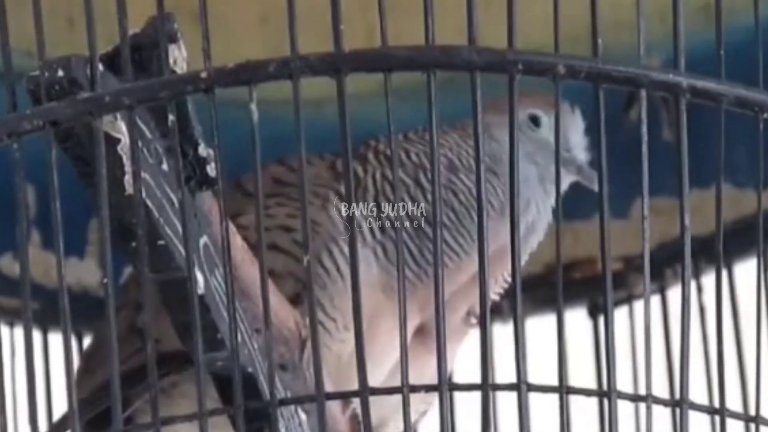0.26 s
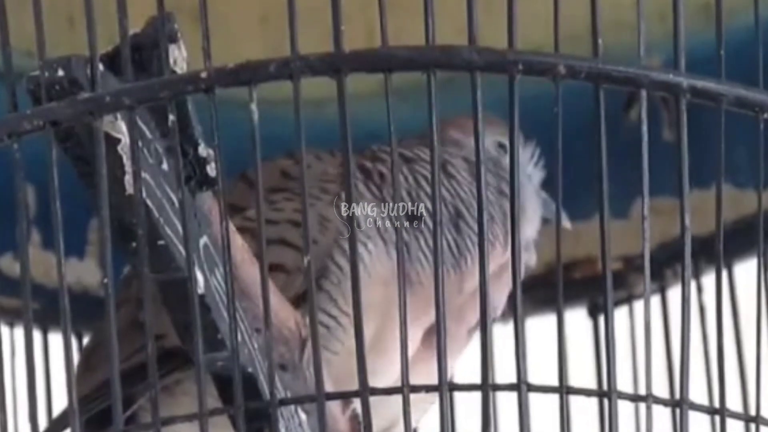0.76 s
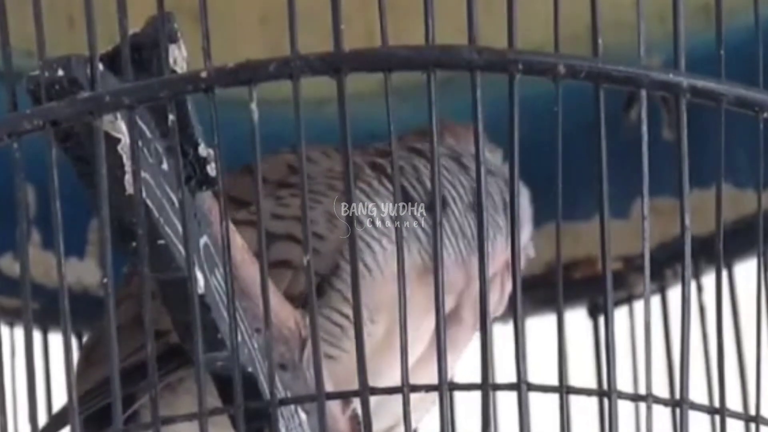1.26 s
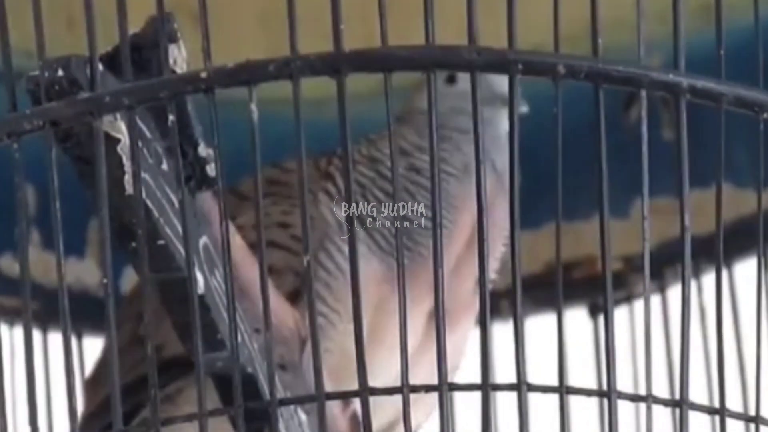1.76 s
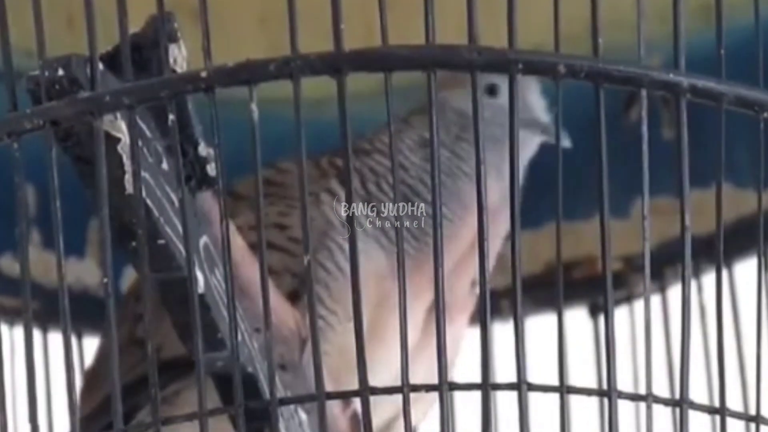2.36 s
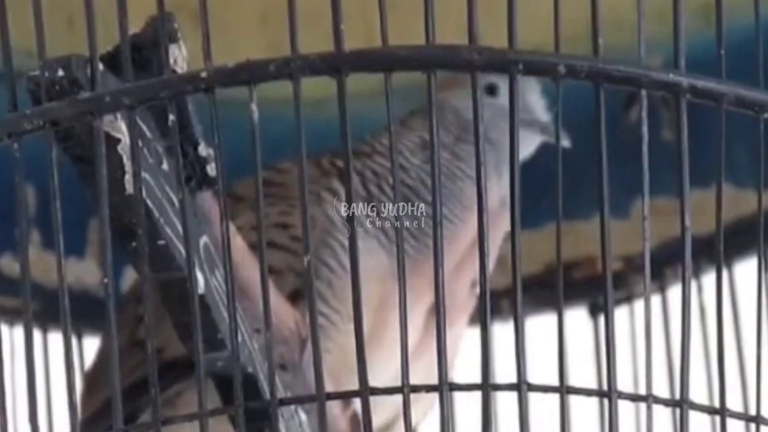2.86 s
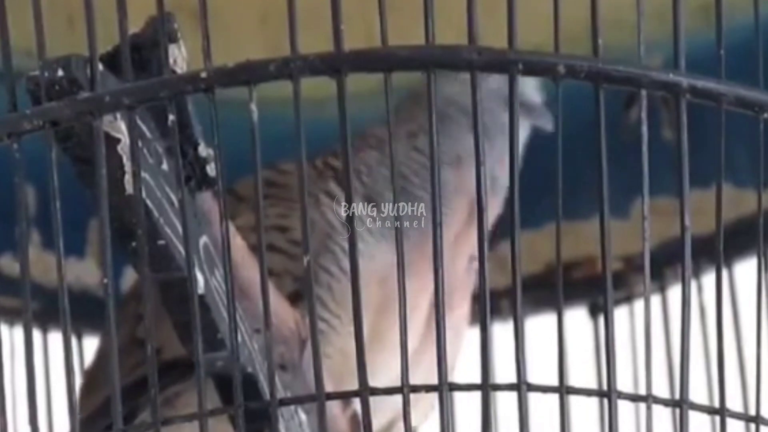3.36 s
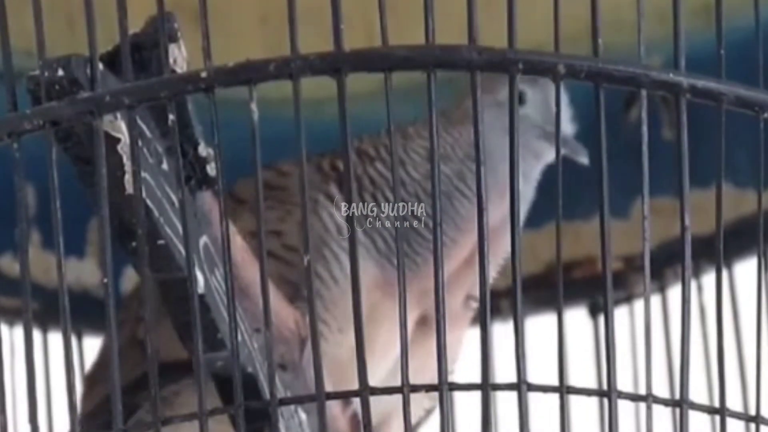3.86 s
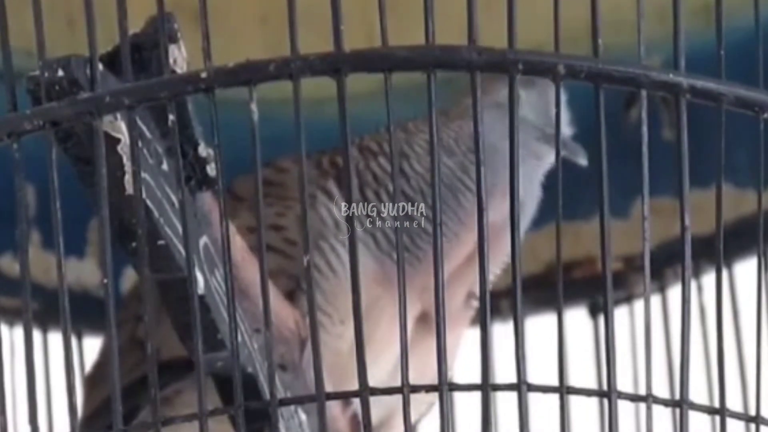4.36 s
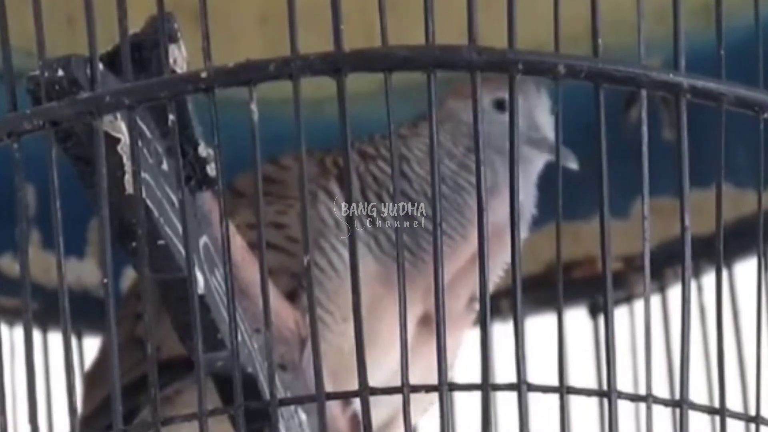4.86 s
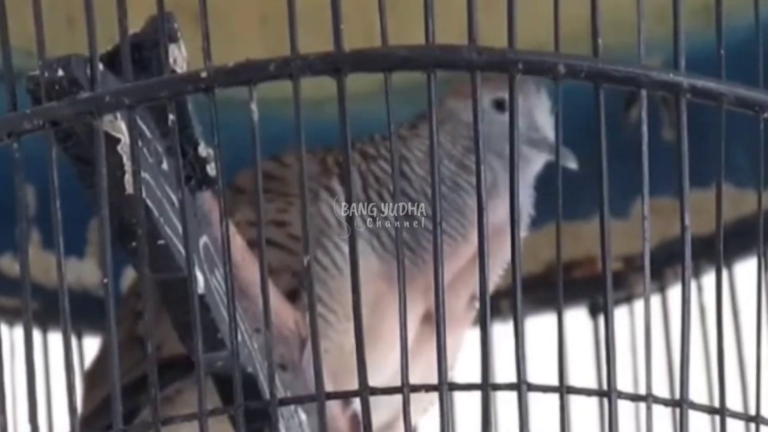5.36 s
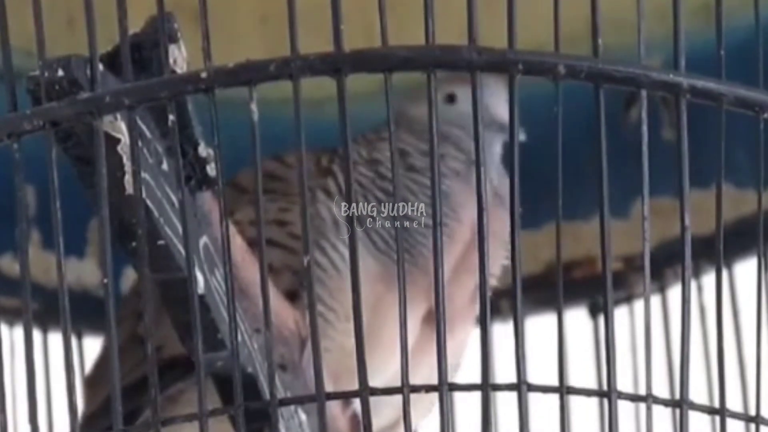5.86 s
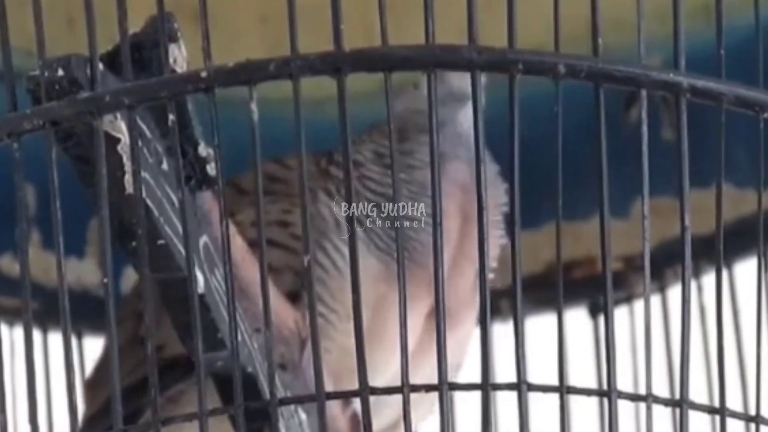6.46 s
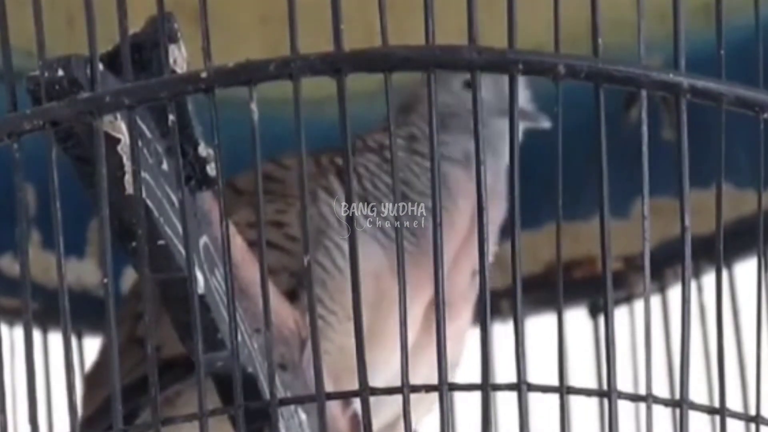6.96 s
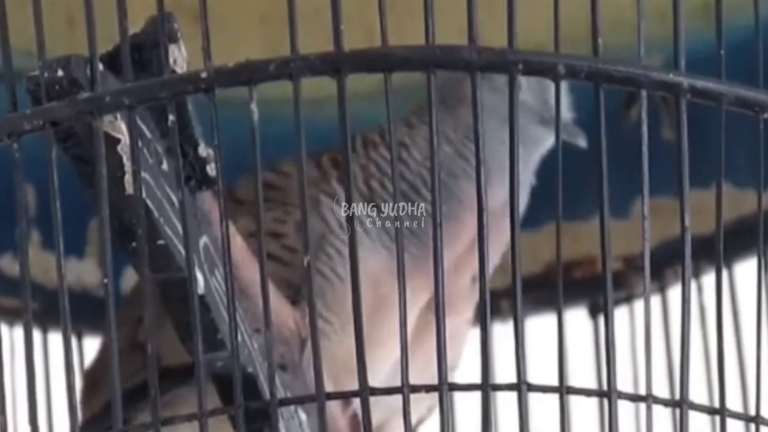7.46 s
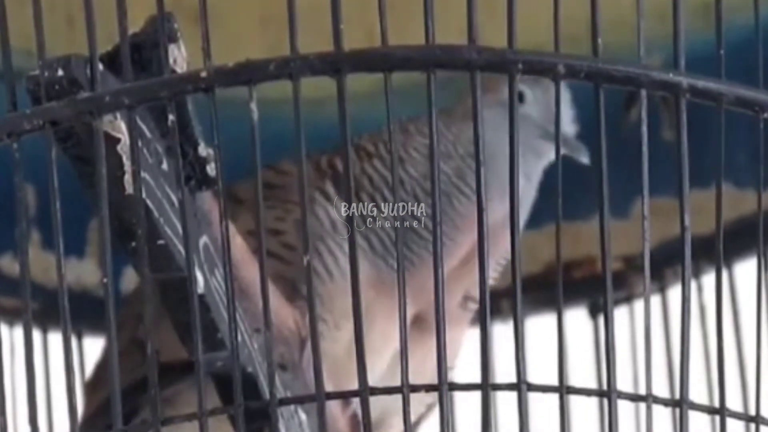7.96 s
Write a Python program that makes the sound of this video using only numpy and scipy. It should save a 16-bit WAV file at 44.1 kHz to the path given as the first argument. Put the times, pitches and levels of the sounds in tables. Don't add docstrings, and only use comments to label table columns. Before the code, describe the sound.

Caged doves in an echoing hard-walled yard, stereo microphone close and overloaded. At 0 s a low dove, slightly left, ends a trill, then gives slow hollow coos at 0.15, 0.6, 1.05 and 1.3 s. A higher dove, nearer centre, enters at 0.75 s with a firm note, quick run and falling close. After a brief lull with faint pigeon coos and a soft wing brush near 2 s, it sings again at 2.3 s, with long sagging notes until 3.7 s. The low dove trills rapidly from 3.65 to 4.15 s; the high one returns at 4.35 s until 5.1 s. From 5.5 to 6.15 s a breathy third dove gives short scooped calls amid wing brushes, tiny high peeps and throat murmurs. The high phrase returns at 6.7 s, then low trills from 7.55 s to the end, with hoarse murmurs. Gritty rasp follows the loud calls; soft ticks pepper everything.

```python
import sys
import numpy as np
from scipy import signal
from scipy.fft import rfft, irfft
from scipy.io import wavfile
from scipy.ndimage import uniform_filter1d

SR = 44100
rng = np.random.default_rng(int(sys.argv[2]) if len(sys.argv) > 2 else 0)


def nominal_scale(level):
    x = np.asarray(level, float) / 20
    return 10 ** x


def generate_wav(signal):
    frames = np.transpose(np.atleast_2d(signal))
    scaled = np.clip(frames, -1, 1) * 32767
    pcm = np.round(scaled).astype(np.int16)
    wavfile.write(sys.argv[1], SR, pcm)


N = 362061

# pitch_hz, level_db
AIR_SPECTRUM = [(18, -70.5), (30, -29), (171, -5.5), (253, -2.5), (288, -5.5), (328, -3), (355, -8.5),
                (511, -7.5), (3780, -20), (4420, -23), (6040, -27.5), (11900, -38), (15000, -57)]
# start_s, length_s, top_hz, level_db
LOW_CARRY_OVER = [
    (0, .06, 965, -27.5),
]
# start_s, length_s, level_db, falsetto_length_s (0 for none)
LOW_TRILL_SYLLABLES = [(.058, .04, -22, 0.0714), (3.65, .05, -22, 0.0464), (3.718, 0.026, -22, 0.03),
                       (3.759, .04, -22, 0.036), (3.819, 0.0583, -24, 0), (3.892, 0.0525, -24.5, 0),
                       (3.962, 0.046, -24, 0.03), (4.073, 0.04, -22.5, 0.0616),
                       (7.573, 0.061, -22.5, 0.0645), (7.625, 0.024, -21.5, 0.031),
                       (7.672, 0.048, -24.5, 0.029), (7.732, 0.0633, -25.5, 0.019),
                       (7.803, 0.0579, -25, 0.017), (7.888, .05, -23.5, 0.02), (7.983, 0.032, -21, 0.062)]
# start_s, length_s, top_hz, level_db
LOW_SLOW_COOS = [
    (0.143, 0.26, 951, -29.5),
    (.604, 0.26, 956, -29.5),
    (1.062, 0.12, 955, -28),
    (1.302, 0.27, 952.5, -30),
]
# start_s, length_s, top_hz, level_db
HIGH_OPENINGS = [
    (.758, .15, 1199, -20),
    (2.312, 0.11, 1242, -22),
    (4.352, .14, 1194, -24),
    (6.679, .16, 1207, -24),
]
# start_s, length_s, top_hz, level_db
HIGH_RUNS = [
    (.895, 0.074, 1190, -27),
    (.955, 0.072, 1145, -24.5),
    (1.04, 0.082, 1154, -25),
    (2.417, .076, 1217, -23),
    (2.482, 0.0912, 1175, -24.5),
    (2.578, 0.063, 1183, -24),
    (4.484, 0.0655, 1190, -23),
    (4.555, 0.1, 1162, -27.5),
    (6.831, 0.085, 1159, -25.5),
    (6.915, 0.095, 1174, -25),
]
# start_s, length_s, top_hz, level_db
HIGH_CLOSINGS = [
    (1.156, .15, 1164, -25.5),
    (2.668, 0.15, 1207, -25),
    (2.883, 0.17, 1171, -27.5),
    (3.146, 0.2, 1189, -27),
    (3.45, 0.24, 1184, -28),
    (4.669, 0.17, 1177, -28),
    (4.91, .18, 1163, -28),
    (7.014, .17, 1165, -26.5),
    (7.253, 0.13, 1153, -25),
]
# start_s, length_s, top_hz, level_db
FAR_SMALL_BIRDS = [
    (1.752, 0.047, 2200, -50.5),
    (1.63, 0.25, 2000, -65),
    (0.89, .06, 5250, -47),
    (6.9, .05, 7170, -55),
    (5.755, .05, 7130, -59),
    (5.868, .04, 7170, -45.5),
    (6.035, 0.072, 7200, -49.5),
    (3.3, 0.091, 3700, -52),
]
# start_s, length_s, top_hz, level_db
THROAT_MURMURS = [(2.885, 0.08, 820, -33), (4.14, 0.04, 940, -36), (8.05, 0.045, 880, -30),
                  (2.6, 0.027, 1120, -33), (1.8, .2, 1100, -51), (5.6, 0.137, 893, -40.5),
                  (5.8, 0.15, 820, -38), (6.13, 0.07, 1040, -35.5), (6.612, 0.088, 1050, -41.5),
                  (7.49, 0.23, 1126, -31.5), (3.2, 0.046, 850, -39), (2.42, .15, 766, -31.5),
                  (7.93, 0.1, 1150, -24.5), (8.12, 0.17, 1072, -26)]
# start_s, length_s, pitch_hz, level_db
PIGEON_TONES = [(1.875, 0.29, 629.6, -46.5), (1.88, 0.1, 540.5, -43.5), (1.95, 0.18, 476, -49),
                (2.09, 0.19, 561.6, -44), (2.16, .13, 695, -42.5), (2.53, 0.28, 651, -43.5),
                (2.54, 0.18, 560, -43.5), (2.75, 0.093, 546, -39), (4.79, 0.11, 614, -39.5),
                (4.83, 0.055, 517, -43), (4.96, 0.14, 576.4, -42), (5.07, 0.18, 696, -45),
                (5.08, 0.11, 627, -43), (5.27, 0.2, 566, -47), (5.3, 0.28, 706.4, -42),
                (5.5, 0.24, 622.5, -43.5), (5.55, 0.24, 549, -42.5), (7.56, 0.21, 757, -45),
                (7.58, .12, 590, -43.5), (7.85, .15, 663, -40.5), (8.09, 0.12, 565, -42)]
# peak_s, peak_db
WING_STROKES = [
    (1.93, -65.5),
    (1.993, -52.5),
    (5.516, -62),
    (5.55, -53.5),
    (5.82, -53.5),
    (5.882, -60),
]
# pitch_hz, level_db
WING_SPECTRUM = [(590, -88), (1000, -38), (1180, 2), (1300, -8), (1860, -6), (3220, 4), (3520, -4),
                 (4110, -0.5), (4540, -12), (7460, -15), (14000, -40)]
# start_s, length_s, top_hz, level_db
THIRD_NOTES = [
    (5.509, 0.071, 915, -24),
    (5.525, .05, 1156, -21.5),
    (5.555, .08, 1273, -24),
    (5.688, 0.12, 1169, -28),
    (5.744, 0.031, 954, -26.5),
    (5.843, 0.09, 1160, -27),
    (6.006, 0.064, 795, -34),
    (6.022, 0.13, 1169, -25),
]
# multiple, level_db
CLOSE_OVERTONES = [(1, 11.5), (2, -30), (4, -37), (6, -39)]
THIRD_OVERTONES = [(1, 3), (2, -23.5), (4, -23)]
PURE_TONE = [(1, 0)]
BIRD_PLACES = {"high": (-0.5, 5.5, -1.5, 0.5), "low": (3.4, 1.8, -2.44, 2), "third": (4, 5, -4.5, 0.64),
               "pigeon": (0.88, 0.2, 1.45, 3)}
# pitch_hz, level_db
RASP_SPECTRUM = [(40, -5.5), (300, -16.5), (700, -5), (1500, -2), (3000, -6.5), (6000, -11), (10000, -17),
                 (14800, -26.5), (15300, -60)]

CLOSE_WAVER = .002


def drift(rate_hz):
    r = np.exp(-2 * np.pi * rate_hz / SR)
    slow = signal.lfilter([1], [1, -2 * r, r * r], rng.standard_normal(N + SR))[SR:]
    return slow / slow.std()


def stereo(mid, side, alike):
    return np.sqrt(1 + alike) * mid + np.sqrt(1 - alike) * side * [[1], [-1]]


def coloured(spectrum, alike):
    hz, level_db = np.transpose(spectrum)
    mid, side = rng.standard_normal((2, N))
    bins_hz = np.maximum(np.fft.rfftfreq(N, 1 / SR), 1)
    gain = nominal_scale(np.interp(np.log(bins_hz), np.log(hz), level_db))
    out = irfft(rfft(stereo(mid, side, alike)) * gain, N)
    return out / out.std()


def patchy(x, patch_db):
    cells = signal.stft(x, nperseg=1024)[2]
    bands = cells.shape[1]
    chance = np.minimum(rng.standard_normal((bands // 8 + 1, cells.shape[2])), .7)
    gains = nominal_scale(patch_db * np.repeat(chance, 8, axis=0)[:bands])
    out = signal.istft(cells * gains, nperseg=1024)[1][:, :N]
    return out / out.std()


def echo_clouds():
    t60_s, gap_s, wall_cut_hz = 0.47, 0.00491, 2450
    t = np.arange(SR) / SR
    mid, side = rng.standard_normal((2, 4, 1, SR))
    cloud = stereo(mid, side, alike=0.11) * nominal_scale(-60 * t / t60_s) * (t > gap_s)
    cloud = cloud / np.sqrt(np.sum(cloud ** 2, axis=2, keepdims=True))
    return signal.sosfilt(signal.butter(1, wall_cut_hz, fs=SR, output="sos"), cloud)


def yard(x, place, echoes):
    pan_db, lag, walls_db, echo_set = BIRD_PLACES[place]
    i = np.arange(N)
    left = nominal_scale(pan_db / 2) * np.interp(i - lag, i, x)
    right = nominal_scale(-pan_db / 2) * x
    walls = signal.fftconvolve(x[None], echoes[int(echo_set)], axes=1)[:, :N]
    return np.array([left, right]) + nominal_scale(walls_db) * walls


def sung(rows, grace_hz, sag_hz_per_s):
    return [(s, length, hz - grace_hz, hz, hz - sag_hz_per_s * length, db) for s, length, hz, db in rows]


def faint(rows):
    return sung(rows, grace_hz=26, sag_hz_per_s=360)


def voice(notes, overtones, hold_s=.02, scoop_hz=70, rise_s=0.00914, sag=2.2, attack_s=0.014,
          release_s=0.018, fade_db=-7, waver=0.011, breath_db=-30):
    out, wobble, air = np.zeros(N + SR), drift(89), drift(232)
    for s, length, start_hz, top_hz, end_hz, level_db in notes:
        at = max(round(s * SR), 0)
        t = np.arange(min(round(length * SR), N - at)) / SR
        span = slice(at, at + len(t))
        hurry = np.clip(1.5 - length / .1, 0, 1)
        below_hz = top_hz - start_hz + hurry * scoop_hz
        jump = np.exp(-np.maximum(t - (1 - hurry) * hold_s, 0) / rise_s)
        pitch_hz = top_hz - below_hz * jump + (end_hz - top_hz) * (t / length) ** sag
        phase = 2 * np.pi * np.cumsum(pitch_hz * (1 + waver * wobble[span])) / SR
        tone = sum(nominal_scale(db) * np.sin(k * phase) for k, db in overtones)
        edges = np.clip(np.minimum(t / attack_s, (length - t) / release_s), 0, 1)
        shape = np.sin(np.pi / 2 * edges) ** 2
        breath = 1 + nominal_scale(breath_db) * air[span]
        out[span] += nominal_scale(level_db + fade_db * t / length) * shape * tone * breath
    return out[:N]


def yard_air():
    return nominal_scale(-56.5) * patchy(coloured(AIR_SPECTRUM, alike=0.039), patch_db=2.5)


def trill():
    trill_hz, falsetto_hz, break_s, falsetto_db = 942, 1046.3, 0.026, -0.5
    chest = [(s, length, trill_hz, db) for s, length, db, _ in LOW_TRILL_SYLLABLES]
    head = [(s + break_s, held, falsetto_hz, db + falsetto_db)
            for s, _, db, held in LOW_TRILL_SYLLABLES if held > 0]
    return sung(chest, 147, 54) + sung(head + LOW_CARRY_OVER, 40, 370)


def low_dove():
    out = voice(trill(), CLOSE_OVERTONES, scoop_hz=6, rise_s=0.00851, attack_s=0.012, release_s=0.011,
                fade_db=-6.5, waver=0.016, breath_db=-16)
    out += voice(sung(LOW_SLOW_COOS, grace_hz=190, sag_hz_per_s=480), CLOSE_OVERTONES, hold_s=.016,
                 rise_s=0.00694, sag=2.5, attack_s=0.036, fade_db=0.5, waver=CLOSE_WAVER)
    under_hz, under_s, under_db = 759.4, 0.1, -8
    under = [(s, under_s, under_hz, db + under_db) for s, _, _, db in LOW_SLOW_COOS]
    return out + voice(faint(under), CLOSE_OVERTONES, attack_s=0.0075, release_s=0.055,
                       waver=0.013, breath_db=-14.5)


def high_dove():
    quick = sung(HIGH_OPENINGS, 230, 229) + sung(HIGH_RUNS, 171, 1208)
    out = voice(quick, CLOSE_OVERTONES, hold_s=.025, scoop_hz=4.1, attack_s=0.0088, waver=CLOSE_WAVER)
    out += voice(sung(HIGH_CLOSINGS, grace_hz=220, sag_hz_per_s=950), CLOSE_OVERTONES, rise_s=0.01089,
                 sag=3.3, attack_s=0.058, fade_db=-2.5, waver=CLOSE_WAVER)
    grit_hz, grit_s, grit_db = 1000.3, .05, 2.5
    grit = [(s, grit_s, grit_hz, db + grit_db) for s, _, _, db in HIGH_OPENINGS + HIGH_RUNS + HIGH_CLOSINGS]
    return out + voice(faint(grit), PURE_TONE, attack_s=0.0071, waver=0.038, breath_db=-7.5)


def small_birds():
    return voice(faint(FAR_SMALL_BIRDS), PURE_TONE, waver=CLOSE_WAVER)


def murmurs():
    return voice(faint(THROAT_MURMURS), PURE_TONE, waver=0.0446, breath_db=-8.0)


def pigeon():
    flutter, throb_db, swell_s, die_s = 0.0382, 4, 0.0093, 0.025
    out, wobbles, throbs = np.zeros(N), (drift(35.2), drift(43.5)), (drift(62), drift(67))
    for k, (s, length, hz, level_db) in enumerate(PIGEON_TONES):
        at = round(s * SR)
        t = np.arange(min(round(length * SR), N - at)) / SR
        span = slice(at, at + len(t))
        phase = 2 * np.pi * np.cumsum(hz * (1 + flutter * wobbles[k % 2][span])) / SR
        shape = np.clip(np.minimum(t / swell_s, (length - t) / die_s), 0, 1)
        out[span] += shape * nominal_scale(level_db + 1.5 + throb_db * throbs[k % 2][span]) * np.sin(phase)
    return out


def wing():
    rise_db_per_s, fall_db_per_s = 698, 190
    t = np.arange(N) / SR
    strokes_db = [db + np.minimum(rise_db_per_s * (t - s), fall_db_per_s * (s - t)) for s, db in WING_STROKES]
    loud_db = np.max(strokes_db, axis=0) + 11.5 + 1.06 * drift(80)
    return nominal_scale(loud_db) * coloured(WING_SPECTRUM, alike=0.24)


def third_dove():
    return voice(sung(THIRD_NOTES, grace_hz=39.7, sag_hz_per_s=125), THIRD_OVERTONES, scoop_hz=60,
                 rise_s=0.0094, attack_s=0.0072, fade_db=-9.5, waver=.011, breath_db=-14.5)


def scene():
    echoes = echo_clouds()
    out = yard_air() + yard(low_dove(), "low", echoes)
    out += yard(high_dove() + small_birds(), "high", echoes)
    out += yard(murmurs() + third_dove(), "third", echoes)
    out += yard(pigeon(), "pigeon", echoes)
    return out + wing()


def knee(x, top, hardness):
    return x / (1 + np.abs(x / top) ** hardness) ** (1 / hardness)


def overload(dry):
    squeezed = knee(dry * nominal_scale(1.64), top=.15, hardness=1.0)
    return knee(squeezed, top=.102, hardness=20)


def rasp(clipped):
    power = np.abs(uniform_filter1d(clipped ** 2, size=1500, axis=1))
    quick = np.abs(uniform_filter1d(clipped ** 2, size=160, axis=1))
    beating = np.abs(uniform_filter1d(np.abs(quick - power), size=700, axis=1))
    strain = np.sqrt(.45 * power + beating)
    return nominal_scale(-27.5) * strain * patchy(coloured(RASP_SPECTRUM, alike=0.37), patch_db=12.0)


def rejoin(x):
    joints_per_s, first_joint_s = 40.04, -.0052
    slip_s, jitter_s, blend_s = .00003, .003, .00004
    count = int(N / SR * joints_per_s) + 2
    chance = rng.standard_normal((count + 1, 2))
    joints = (first_joint_s + np.arange(count) / joints_per_s + jitter_s * chance[1:, 0]) * SR
    to_and_fro = (-1) ** np.arange(count + 1)
    slips = np.round(slip_s * SR * (0.33 * chance[:, 1] + to_and_fro))
    i = np.arange(N)
    piece = np.searchsorted(joints, i)
    before = np.maximum(piece - 1, 0)
    blend = np.clip((i - joints[before]) / (blend_s * SR), 0, 1)
    old, new = i + slips[before], i + slips[piece]
    return np.array([(1 - blend) * np.interp(old, i, c) + blend * np.interp(new, i, c) for c in x])


def band_limit(x):
    return signal.sosfilt(signal.butter(12, 15400, fs=SR, output="sos"), x)


def record(dry):
    clipped = overload(dry)
    joined = rejoin(clipped + rasp(clipped))
    top_cut = signal.cheby2(10, 60, 15650, fs=SR, output="sos")
    finished_mix = signal.sosfilt(top_cut, joined)
    return band_limit(finished_mix)


dry = scene()
out = record(dry)
generate_wav(out)
```